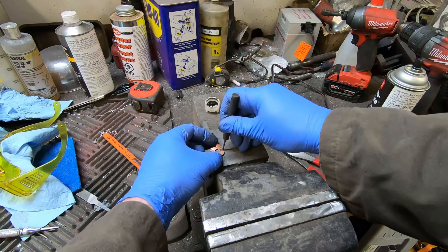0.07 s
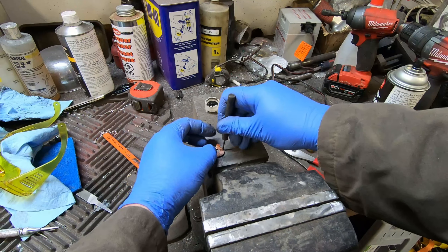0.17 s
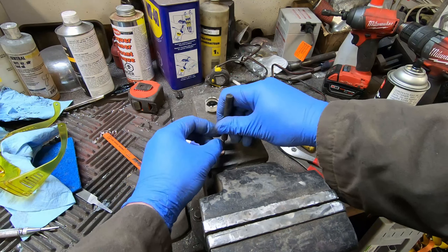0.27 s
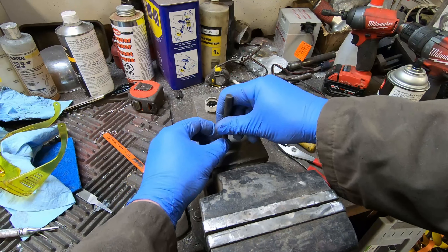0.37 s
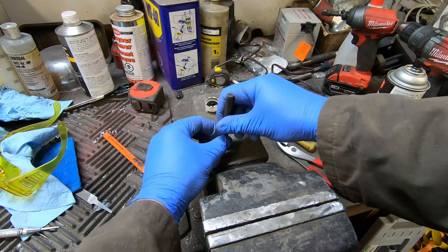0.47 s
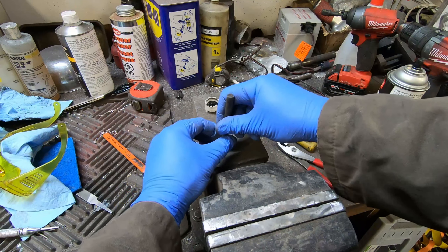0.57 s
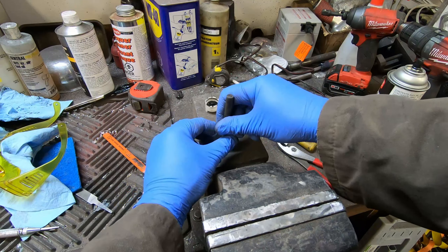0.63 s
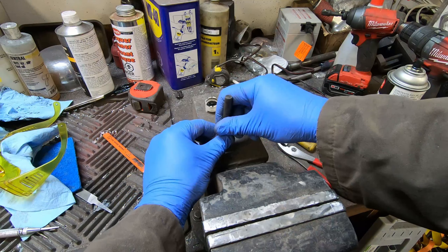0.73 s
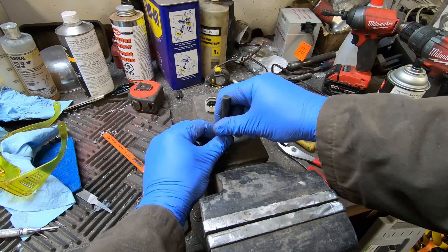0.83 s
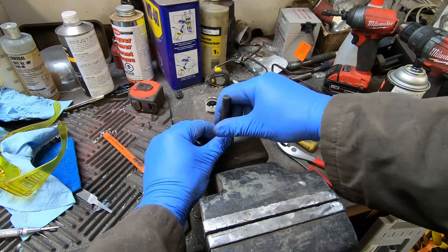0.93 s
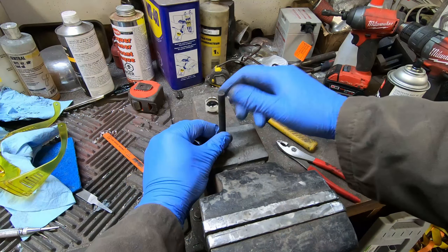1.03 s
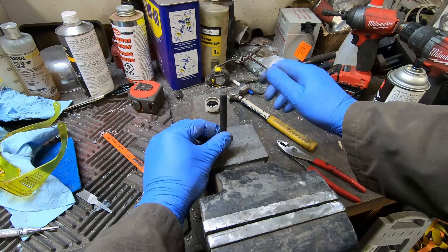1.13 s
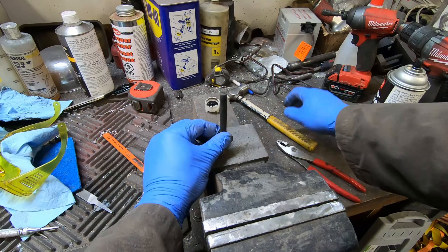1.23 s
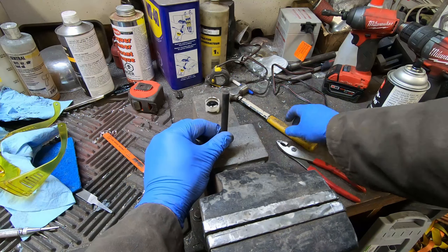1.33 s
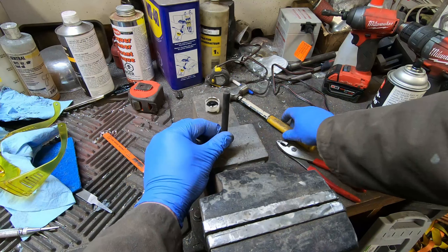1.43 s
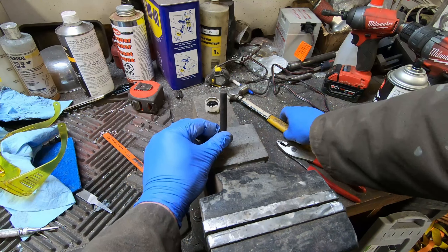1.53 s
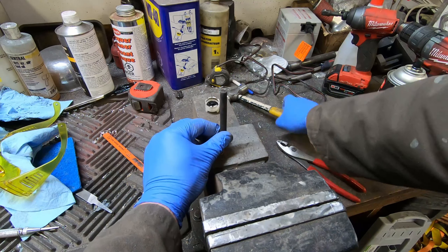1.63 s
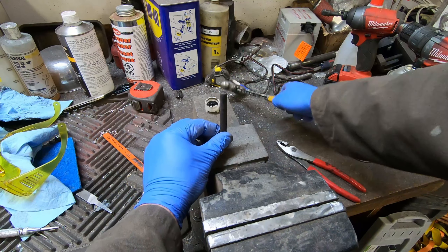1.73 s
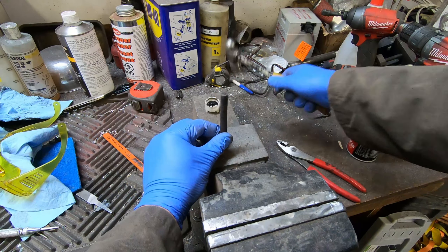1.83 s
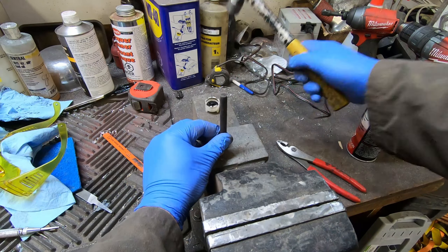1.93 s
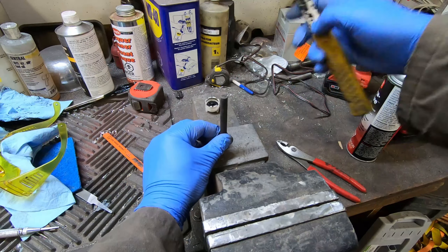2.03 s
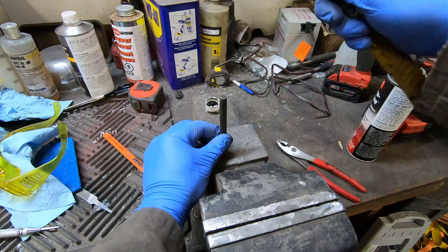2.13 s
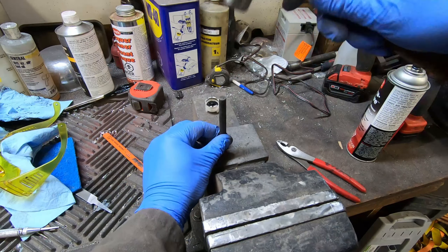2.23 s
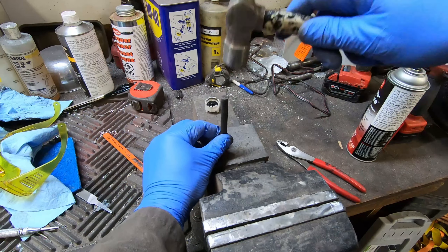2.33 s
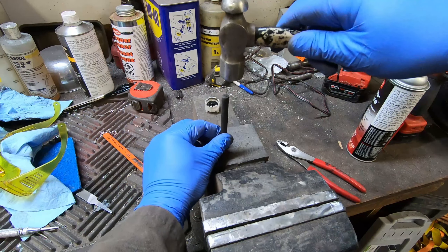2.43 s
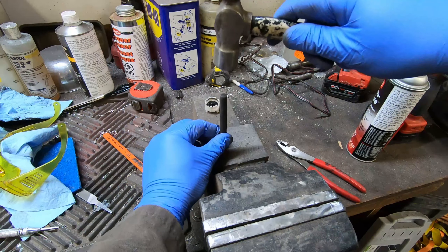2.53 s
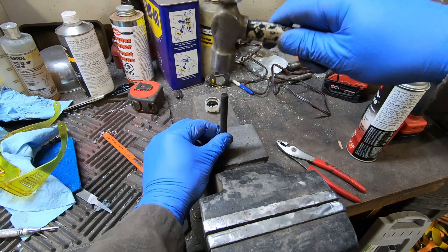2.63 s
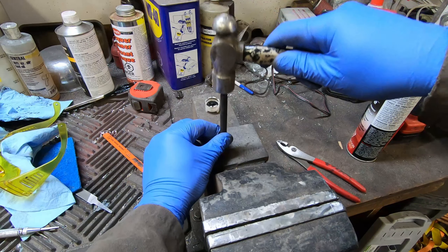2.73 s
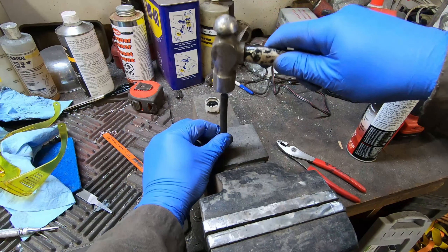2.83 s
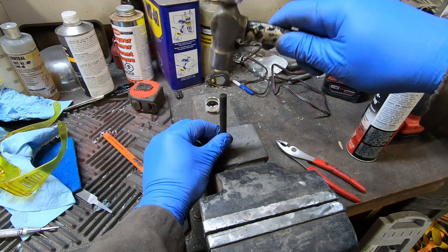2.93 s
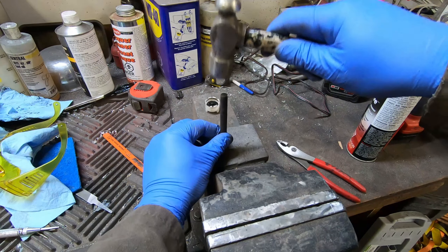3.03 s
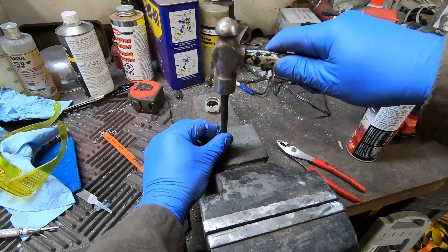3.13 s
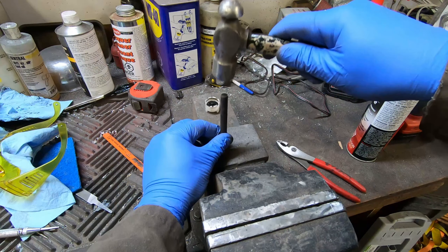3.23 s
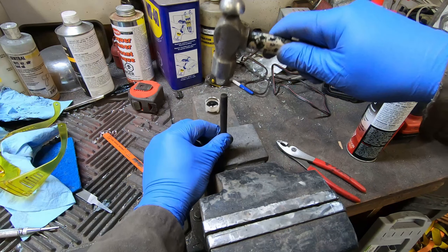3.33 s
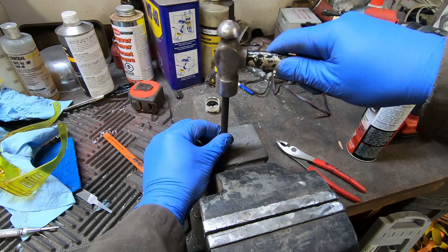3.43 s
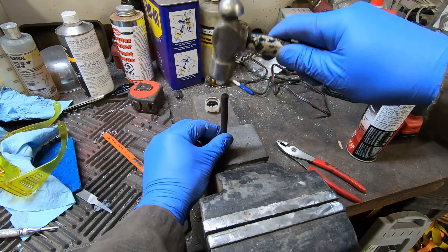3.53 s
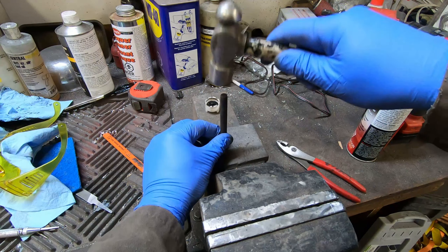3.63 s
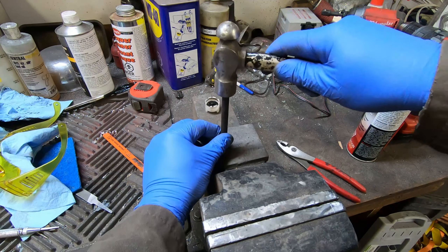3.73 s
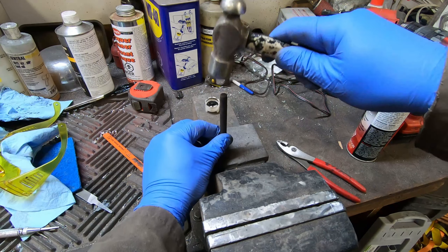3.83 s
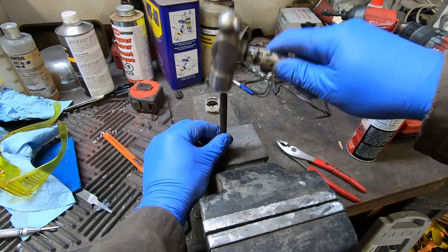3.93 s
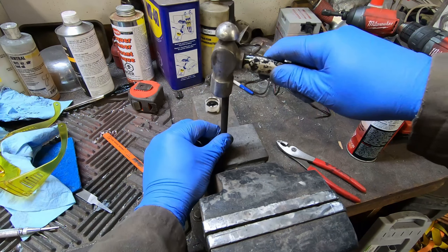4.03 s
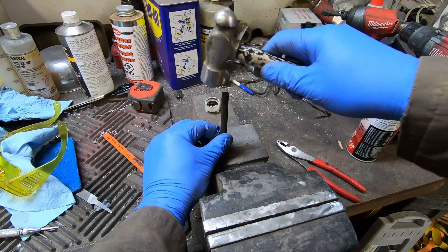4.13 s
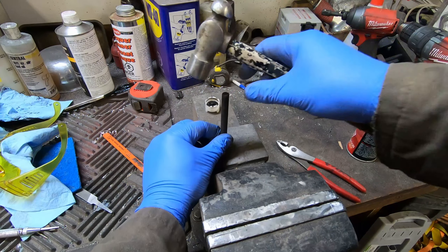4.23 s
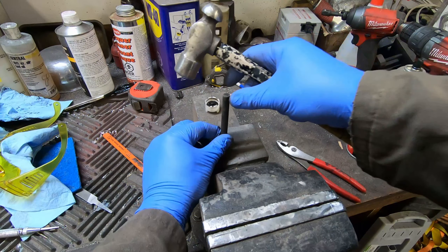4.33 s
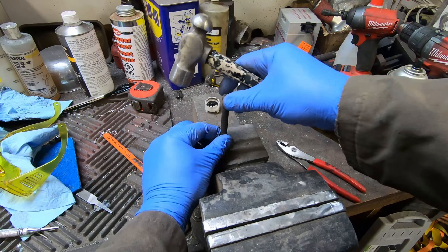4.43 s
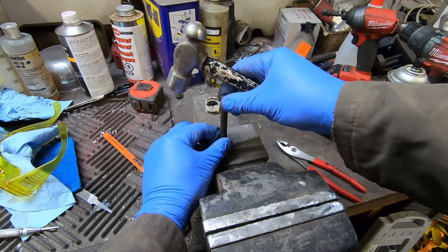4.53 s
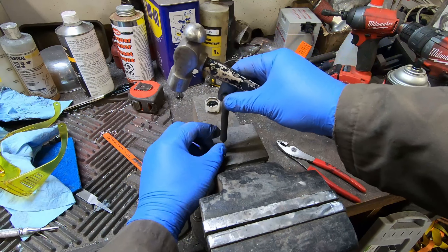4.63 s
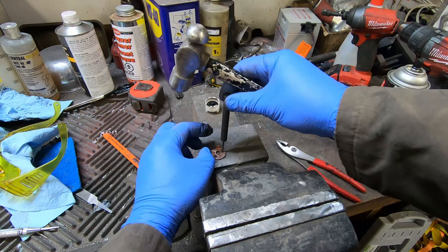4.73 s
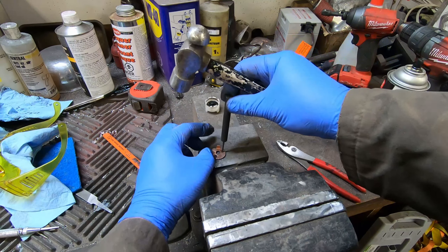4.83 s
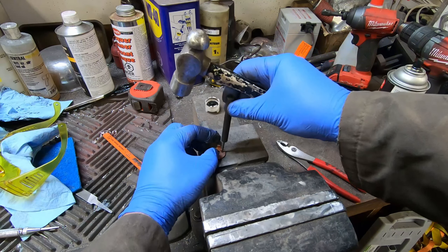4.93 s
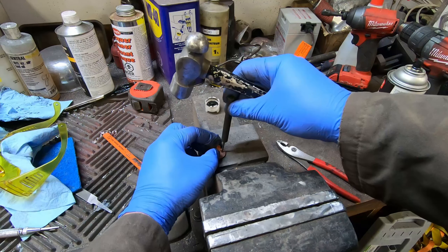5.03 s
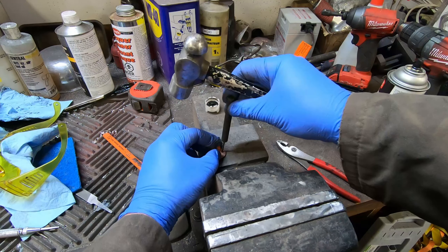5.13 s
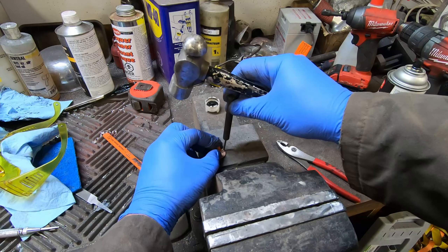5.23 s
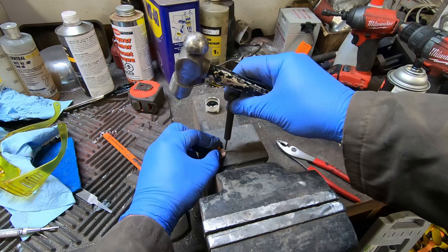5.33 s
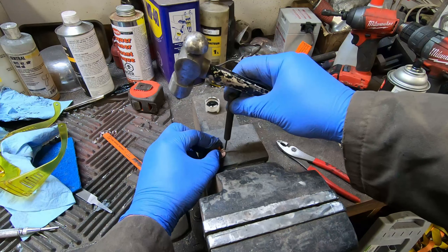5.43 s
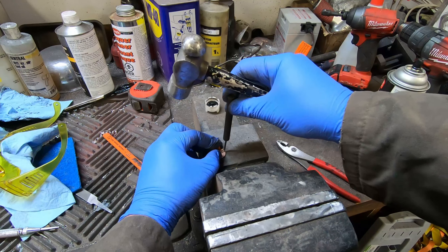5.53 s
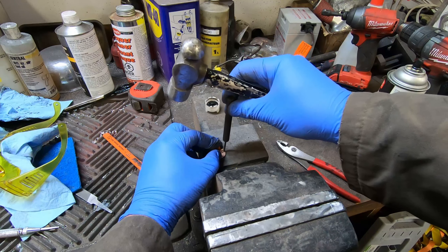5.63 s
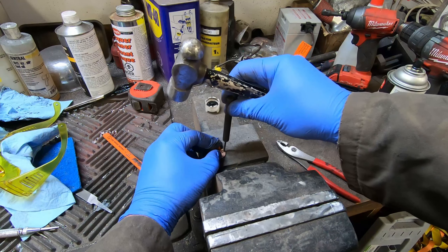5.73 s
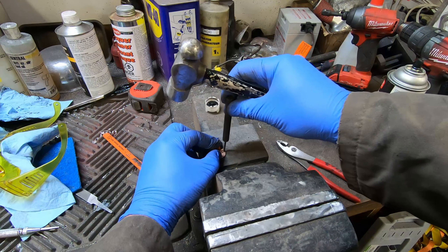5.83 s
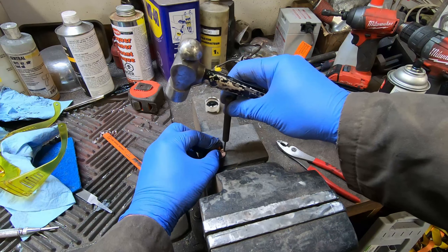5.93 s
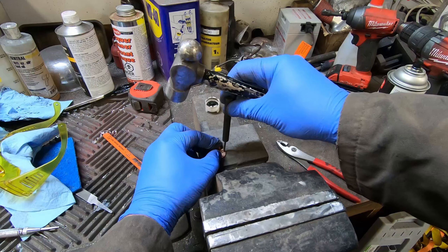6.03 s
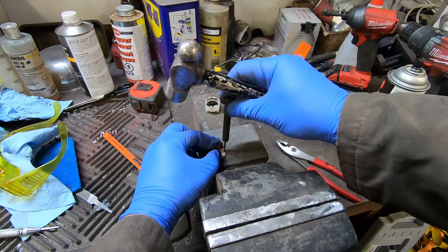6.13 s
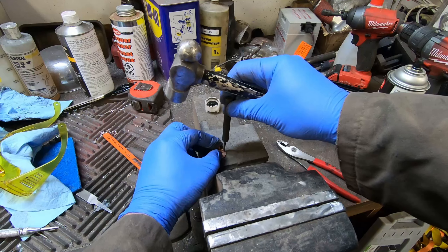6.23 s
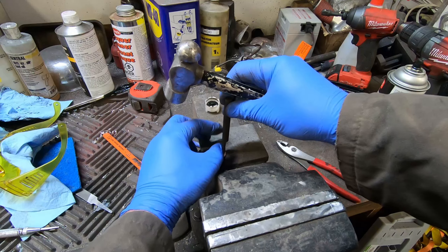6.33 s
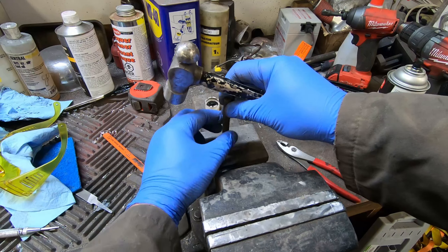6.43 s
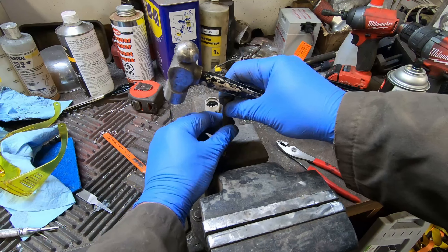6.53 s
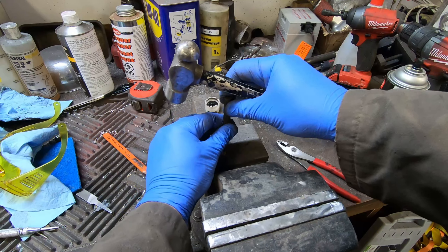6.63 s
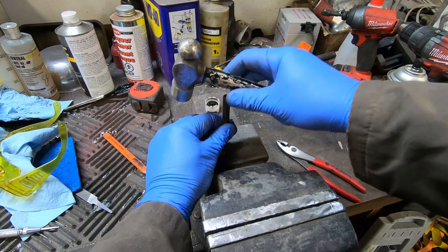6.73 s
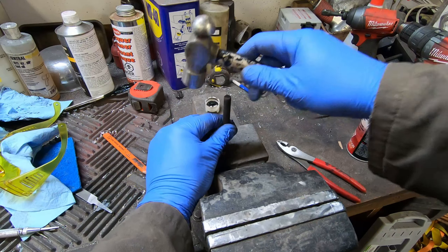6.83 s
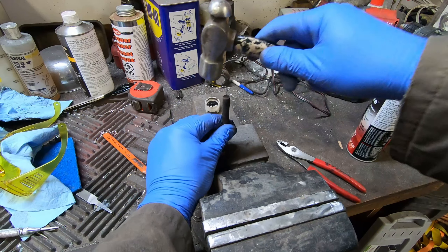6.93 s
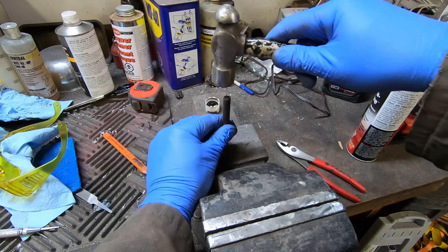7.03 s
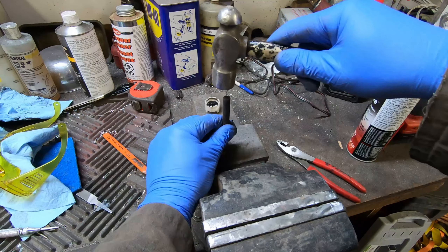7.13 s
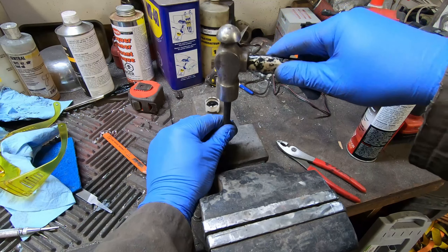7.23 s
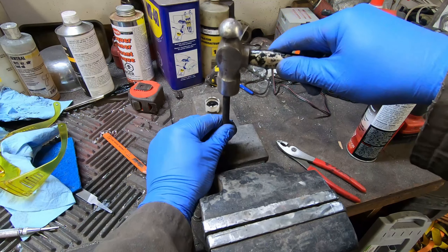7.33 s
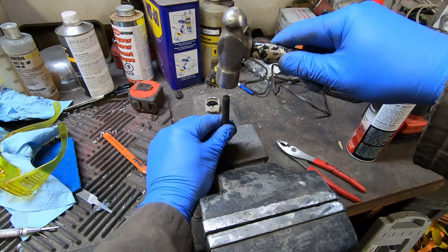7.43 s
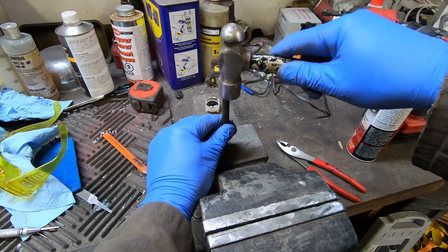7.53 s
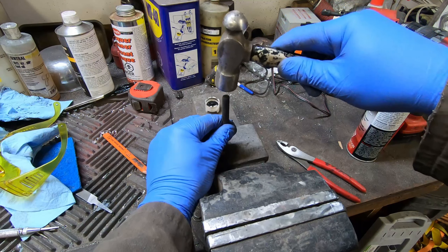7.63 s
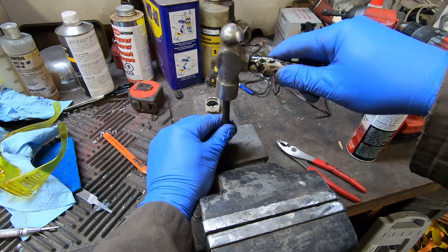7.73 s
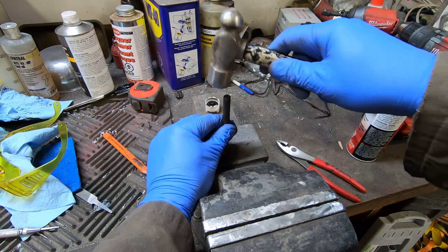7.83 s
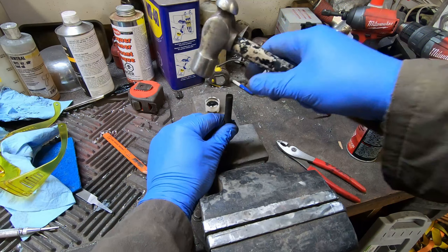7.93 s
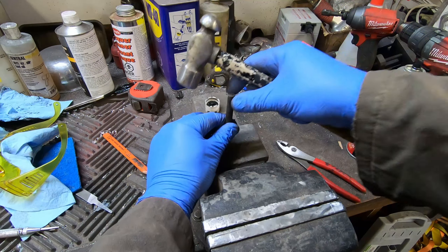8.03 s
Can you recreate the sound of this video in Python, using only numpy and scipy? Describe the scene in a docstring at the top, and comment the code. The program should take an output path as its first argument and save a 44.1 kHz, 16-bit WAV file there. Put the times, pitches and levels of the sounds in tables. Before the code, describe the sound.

A hammer taps a steel punch, strikes four sharp clinking blows, pauses, then strikes three more, each thudding into a workbench.

```python
"""A ball-peen hammer drives a steel punch against a metal block on a cluttered workbench: a trial tap,
four blows, then three more. Each is a steel clink and, a moment later, the thud of the bench; the vise
sings on faintly and the small workshop answers. Before that the hammer is dragged off the bench and
slides through a rubber glove. A sleeve rustles over quiet room tone."""
import sys
import numpy as np
from scipy import signal
from scipy.fft import rfft, irfft, next_fast_len
from scipy.io import wavfile
from scipy.ndimage import map_coordinates

SR = 44100
rng = np.random.default_rng(int(sys.argv[2]) if len(sys.argv) > 2 else 0)


def output_pcm(signal):
    """Save a mono or channel-first signal as 16-bit PCM at the path in sys.argv[1].

    Samples are clipped to [-1, 1] before scaling.
    """
    pcm = np.clip(np.atleast_2d(signal).T, -1, 1) * 32767
    wavfile.write(sys.argv[1], SR, np.round(pcm).astype(np.int16))


N = 357165

# hammer hits on the punch, with one rebound: start_s, force_db, edge_ring_db, sizzle_db
# (the last two are trims within the clink)
BLOWS = [(2.9049, -13.5, -4, -28), (3.2168, -0.5, 1.5, -6.5), (3.5164, -0.5, 2, 4.5),
         (3.7973, 1, -1.5, 4.5), (4.0832, 0.7, -15.5, -12), (4.1252, -12.5, 0, 2), (7.364, -4.5, -4.5, 8),
         (7.6188, -1, -5, 7), (7.8353, -0.46, -13.5, 3.5)]


def hammering():
    """Steel clinks at once and the bench thuds after it; the same spot is hit, so all blows ring alike."""
    # first contact of the two steel faces: pitch_hz, level_db, t60_s
    contact_modes = [(7089, -8.5, 0.0044), (7600, -7, .0045)]
    # hammer head and block: pitch_hz, level_db, t60_s
    steel_modes = [(1390.5, -21.5, 0.018), (2356, -30, 0.1), (3733, -36, 0.2), (4460, -40.5, .13),
                   (5910, -44, 0.2), (7000, -24, 0.049), (7560, -31.5, 0.07), (8394, -31.5, .06)]
    # the punch, damped by the fingers: pitch_hz, level_db, t60_s
    punch_modes = [(13000, -22, 0.027), (13113, -8, 0.0053), (14490, -21.5, .008)]
    # bench top with block and vise: pitch_hz, level_db, t60_s
    bench_modes = [(48.06, -42, .42), (83, -40, .3), (121.3, -16.5, .16), (228.8, -28.5, 0.45),
                   (245.2, -7.5, 0.055), (280.9, -23, 0.14), (340.6, -10.5, 0.071), (411, -3, 0.05),
                   (452.4, -20, 0.27), (535.3, -7.5, 0.059), (568, -24, 0.24), (607, -30, 0.39),
                   (666, -25.5, 0.3), (796.6, -21, 0.15), (853.7, -20.5, .11), (927.86, 4.5, .021),
                   (985.7, -22.5, .17), (999.4, -10.5, 0.058), (1142.2, -8.5, 0.05), (1208, -31, 0.25),
                   (1310, -27.5, .2), (1480.4, -37, 0.25), (1671.8, -36.5, 0.13)]
    # dense high modes of the block: freq_hz, level_db
    crash_spectrum = [(700, -11), (1500, 2.5), (2300, 0.5), (2800, -3.5), (3700, 0.5), (5000, 1),
                      (6300, -7), (8000, -8), (10500, -12), (15000, -16.5), (17000, -26)]
    # the block chattering on the vise: freq_hz, level_db
    sizzle_spectrum = [(5000, -28.5), (6400, -17.5), (6750, -1), (7900, 0), (8900, 3.5), (9700, -5),
                       (11500, -20), (13000, -16), (16000, -23)]
    # loose things on the bench: freq_hz, level_db
    clatter_spectrum = [(100, -40.5), (250, -1), (420, 5), (700, 0), (1150, 1.5), (1450, -3), (1800, -9.5),
                        (2200, -13), (2700, -24.5), (6000, -58.5)]
    out, t = np.zeros(N), np.arange(SR // 2) / SR
    shared_crash, shared_clatter = noise(crash_spectrum, len(t)), noise(clatter_spectrum, len(t))
    crash_envelope = amp(-17.0) * fade(t, 0.055) * (1 - np.exp(-t / 0.00065))
    clatter_envelope = amp(-11.0) * fade(t, 0.11) * (1 - np.exp(-(t / 0.0026) ** 2))
    sizzle_envelope = amp(-22.5) * fade(t, 0.055)
    for start, force_db, edge_db, sizzle_db in BLOWS:
        clink_db = -1.6 + 1.7 * force_db  # the clink grows faster with force than the thud
        crash = crash_envelope * unit(shared_crash + noise(crash_spectrum, len(t)))
        contact = ring(contact_modes, t, scatter_db=-4.0)
        steel = ring(steel_modes, t, scatter_db=-1.0, rise_cycles=2.2)
        clatter = clatter_envelope * unit(shared_clatter + 0.93 * noise(clatter_spectrum, len(t)))
        bench = amp(1.04) * ring(bench_modes, t, scatter_db=0.38, travel_s=0.002595, rise_cycles=0.77)
        # a light blow stays in contact longer, so its thud is duller
        cutoff_hz = 1500 + 2000 * min(amp(clink_db), 1)
        thud = signal.sosfilt(signal.butter(4, cutoff_hz, fs=SR, output="sos"), bench + clatter)
        edge = ring(punch_modes, t, scatter_db=5.5, rise_cycles=0.98)
        sizzle = sizzle_envelope * noise(sizzle_spectrum, len(t))
        clink = contact + steel + crash + amp(edge_db) * edge + amp(sizzle_db) * sizzle
        add(out, start, amp(force_db) * thud + amp(clink_db) * clink)
    return out


def vise():
    """Every thud tops up the energy of the vise, renewing a faint, slowly fading chord."""
    # the vise's lasting ring: pitch_hz, level_db, t60_s
    vise_modes = [(377, -63, 3.9), (466, -54.5, 3.1), (754.4, -70, 7.5), (904, -68, 3.4), (998, -70, 3.9),
                  (1171, -67.5, 5)]
    out, t = np.zeros(N), np.arange(N) / SR
    ends = [blow[0] for blow in BLOWS[1:]] + [N / SR]
    energy = 0
    for (start, force_db, *_), end in zip(BLOWS, ends):
        energy += amp(force_db) ** 2
        chord = ring(vise_modes, t[:round((end - start) * SR)], scatter_db=-3.5)
        add(out, start, np.sqrt(energy) * chord)
        energy *= fade(end - start, t60=3) ** 2
    return out


def handling():
    """Light ticks of steel, dull bumps on the bench and one short falling pop of the glove."""
    # small contacts of punch, workpiece and fingers: start_s, level_db, centre_hz
    ticks = [(0.035, -44.5, 1193), (0.135, -39, 1334), (1.101, -45.5, 3580), (1.152, -48, 6040),
             (1.525, -47, 8000), (1.812, -26.5, 1490), (2.299, -46.5, 5500), (4.1235, -24.5, 5080),
             (4.293, -41, 5067), (4.353, -44, 1990), (4.744, -43.5, 1096), (4.768, -46, 4408),
             (4.799, -48.5, 2510), (5.189, -51.5, 2134), (6.276, -54, 4800), (6.399, -50, 5414),
             (6.925, -52.5, 5500)]
    # soft bumps on the bench: start_s, level_db
    bumps = [(1.642, -21.5), (1.756, -23), (1.834, -35), (5.776, -43)]
    # the bench under a soft bump: pitch_hz, level_db, t60_s
    bump_modes = [(136.1, -7.5, 0.11), (356, 1, 0.065), (429, -4, 0.036)]
    # the glove's pop: start_s, level_db, sweep_hz, fall_s
    pops = [(1.3223, -28.5, 1350, 0.00239)]
    out, t = np.zeros(N), np.arange(SR // 5) / SR
    for start, db, hz in ticks:
        colour = [(hz / 5, -24), (hz / 2.7, -7), (hz, 0), (hz * 1.4, -13), (hz * 3, -32)]
        add(out, start, amp(db - 9.5) * fade(t, 0.052) * noise(colour, len(t)))
    for start, db in bumps:
        add(out, start, amp(db) * ring(bump_modes, t, scatter_db=2.5, rise_cycles=2.5))
    for start, db, sweep_hz, fall_s in pops:
        cycles = sweep_hz * fall_s * (1 - np.exp(-t / fall_s)) + 130 * t  # the pitch dives to 130 Hz
        envelope = amp(db) * fade(t, 0.0268) * (1 - np.exp(-t / 0.00099))
        add(out, start, envelope * np.sin(2 * np.pi * cycles))
    return out


def dragging():
    """Steel judders over the bench in uneven slips, and the handle hisses through the glove."""
    # the hammer, later the workpiece, pushed over the bench: start_s, length_s, judder_db, grit_db
    drags = [(1.52, 0.076, -57, -72), (1.718, 0.041, -28, -44), (1.799, 0.023, -29, -40),
             (4.666, 0.095, -63.5, -72), (6.298, 0.874, -71.5, -93.5)]
    # what the sliding steel shakes: pitch_hz, level_db, t60_s
    body_modes = [(133, -9, 0.14), (210.7, -10, 0.09), (335, 1, 0.032), (419, -3, 0.0368),
                  (830, -11, 0.0487), (1010, -11.5, 0.0384), (1250, -19, .04)]
    # gritty scrape under the steel: freq_hz, level_db
    grit_spectrum = [(500, -19.5), (1000, 11), (1400, 0.5), (1900, -3), (2600, 1.5), (3400, -6.5),
                     (4700, -4.5), (8000, -15.5), (15000, -32)]
    # rubber sliding over a tool: start_s, length_s, level_db
    slides = [(1.07, .05, -65.5), (2.067, 0.0227, -55), (2.144, 0.082, -48)]
    # hiss of the rubber glove: freq_hz, level_db
    glove_spectrum = [(900, -19), (1700, -12), (2500, -6), (3600, -7), (6000, -1.5), (9000, -1.5),
                      (14000, -13), (16000, -25.5)]
    starts, lengths, judder_db, grit_db = np.transpose(drags)
    judder_envelope = strokes(starts, lengths, judder_db, attack_s=0.024, release_t60=0.2)
    grit_envelope = strokes(starts, lengths, grit_db, attack_s=0.024, release_t60=0.2)
    glove_envelope = strokes(*np.transpose(slides), attack_s=0.02, release_t60=0.0945)
    slips_per_s = 700
    slips = (rng.random(N) < slips_per_s / SR) * amp(2.64 * rng.standard_normal(N))
    slips *= rng.choice([-1, 1], N)
    body = ring(body_modes, np.arange(SR // 5) / SR, scatter_db=0.0, rise_cycles=0.396)
    judder = signal.fftconvolve(slips, body)[:N]
    judder = unit(signal.sosfilt(signal.butter(6, 108, "high", fs=SR, output="sos"), judder))
    grit = unit(amp(3.5 * wobble(170)) * noise(grit_spectrum, N))
    glove = unit(amp(1.96 * wobble(140)) * noise(glove_spectrum, N))
    return judder_envelope * judder + grit_envelope * grit + glove_envelope * glove


def sleeve():
    """Cloth rustles and its folds snap, swelling as the arm speeds up and slows down in each reach."""
    # arm movements: peak_s, length_s, level_db
    reaches = [(0.228, 0.118, -61), (.47, 0.49, -64), (1.41, 0.856, -58.5), (1.902, 0.39, -57.5),
               (2.336, 0.41, -61), (4.75, 0.263, -65.5), (6.8, 0.524, -65)]
    # rubbing cloth: freq_hz, level_db
    cloth_spectrum = [(88, -33), (150, -5.5), (315, -3.5), (354, -8), (398, -4), (448, -7.5), (1170, -11.5),
                      (10400, -25), (16000, -39)]
    resting_db, snaps_per_s = -76.5, 25
    t = np.arange(N) / SR
    speeds = [amp(db) * np.exp(-(2 * (t - peak) / length) ** 2) for peak, length, db in reaches]
    motion = np.sqrt(amp(resting_db) ** 2 + np.sum(np.square(speeds), axis=0))
    rustle = unit(amp(2.0 * wobble(35)) * noise(cloth_spectrum, N))
    snaps = (rng.random(N) < snaps_per_s / SR) * rng.random(N)
    snap_envelope = signal.fftconvolve(snaps, fade(t[:SR // 20], 0.02))[:N]
    crackle = snap_envelope * noise([(800, -12), (4500, 0), (14000, -14)], N)
    return motion * (rustle + amp(4) * crackle)


def workshop_reverb(x):
    """The small room answers with a diffuse tail in which each frequency dies at its own speed."""
    # decay of the room: freq_hz, t60_s
    room_decay = [(100, 1), (300, 0.5), (1100, 0.44), (4000, 0.5052), (8000, 0.35), (14000, 0.3)]
    # colour of the tail: freq_hz, level_db
    room_colour = [(60, -25), (130, -17.5), (260, -5.5), (500, -10), (1000, -13.5), (2000, -6.5),
                   (5000, -12.5), (7100, -17), (8700, -12.5), (10500, -14.5), (13200, -24), (15000, -21)]
    hz, t, bands = signal.stft(rng.standard_normal(SR), SR, nperseg=256)
    t60 = along(room_decay, hz)[:, None]
    gain = amp(along(room_colour, hz))[:, None] * np.sqrt(2 * np.log(1000) / (t60 * SR))
    tail = signal.istft(bands * gain * fade(t, t60), SR, nperseg=256)[1]
    build_up = 1 - np.exp(-(np.arange(len(tail)) / SR / 0.0048) ** 2)
    return signal.fftconvolve(x, tail * build_up)[:N]


def room_tone():
    """A low, gently wavering rush of air."""
    # air in the quiet room: freq_hz, level_db
    air_spectrum = [(25, -4), (50, -4), (125, -1), (160, -6), (230, -4.5), (400, -12), (700, -14),
                    (1300, -21.5), (2500, -23.5), (5200, -22.5), (9000, -27.5), (16000, -31.5)]
    return amp(-65.0 + 0.73 * wobble(3)) * noise(air_spectrum, N)


def ring(modes, t, scatter_db, travel_s=0, rise_cycles=1):
    """Damped modes at scattered levels; bending waves (travel_s at 1 kHz) bring the low ones later."""
    hz, db, t60 = np.transpose(modes)[:, :, None]
    age = np.maximum(t - travel_s * np.sqrt(1000 / hz), 0)
    gain = amp(db + scatter_db * rng.standard_normal(hz.shape))
    attack = 1 - np.exp(-age * hz / rise_cycles)
    return np.sum(gain * fade(age, t60) * attack * np.sin(2 * np.pi * hz * age), axis=0)


def strokes(starts, lengths, levels_db, attack_s, release_t60):
    """Envelope of rubbing strokes: each swells up to its start, holds and dies away."""
    t = np.arange(N) / SR
    power = np.zeros(N)
    for start, length, db in zip(starts, lengths, levels_db):
        rise = np.exp(np.minimum(t - start, 0) / attack_s)
        release = fade(np.maximum(t - start - length, 0), release_t60)
        power += (amp(db) * rise * release) ** 2
    return np.sqrt(power)


def amp(db):
    """Decibels to gain."""
    return 10 ** (np.asarray(db) / 20)


def unit(x):
    """Scale to rms 1."""
    return x / np.sqrt(np.mean(x ** 2) + 1e-20)


def along(points, hz):
    """Read a curve of (freq_hz, value) points on a log frequency axis."""
    freqs, values = np.transpose(points)
    return np.interp(np.log(hz + 1), np.log(freqs + 1), values)


def wobble(rate):
    """A smooth random curve, rate knots a second."""
    return map_coordinates(rng.standard_normal(int(N * rate / SR) + 4), [np.arange(N) * rate / SR])


def filtered(x, response):
    """Equalise x with a gain given as a function of frequency."""
    size = next_fast_len(len(x) + 8192)
    return irfft(rfft(x, size) * response(np.fft.rfftfreq(size, 1 / SR)), size)[:len(x)]


def noise(spectrum, size):
    """Coloured noise of rms 1."""
    return unit(filtered(rng.standard_normal(size), lambda hz: amp(along(spectrum, hz))))


def fade(t, t60):
    """Exponential decay, 60 dB down after t60 seconds."""
    return np.exp(-np.log(1000) * t / t60)


def add(track, start_s, sound):
    """Mix a sound into the track."""
    part = track[max(round(start_s * SR), 0):][:len(sound)]
    part += sound[:len(part)]


def scene():
    """The bench with the room around it, in mono; the drags are closest, so they get less reverb."""
    struck, dragged = hammering() + handling(), dragging()
    reverb = workshop_reverb(struck + amp(-6.0) * dragged)
    return (struck + dragged + reverb + vise() + sleeve() + room_tone())[None]


def record(dry):
    """Cut the deepest bass, soft-clip the highest peaks and roll off the very top steeply."""
    low_cut_hz, ceiling, top_hz = 38, 0.97, 16300
    sound = signal.sosfilt(signal.butter(3, low_cut_hz, "high", fs=SR, output="sos"), dry[0])
    rounded = sound / (1 + np.abs(sound / ceiling) ** 6) ** (1 / 6)
    return filtered(rounded, lambda hz: 1 / (1 + (hz / top_hz) ** 120))[None]


dry = scene()
out = record(dry)
output_pcm(out)
```